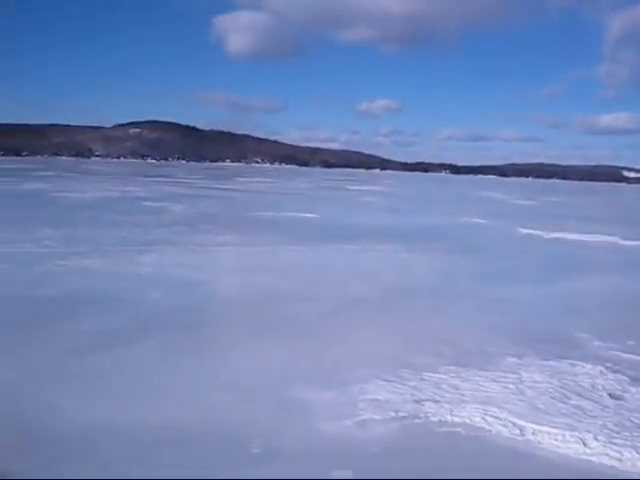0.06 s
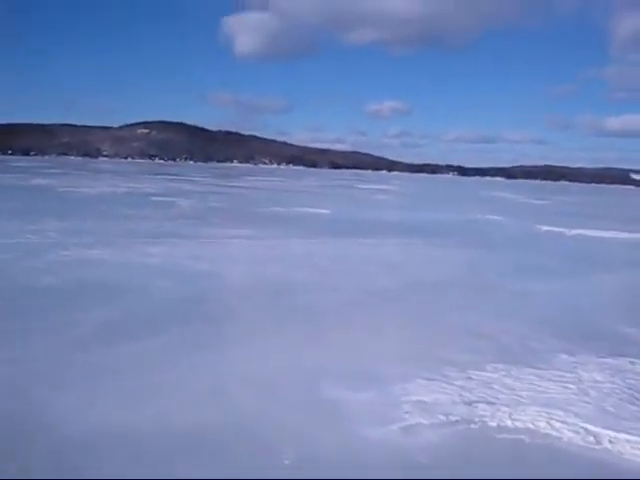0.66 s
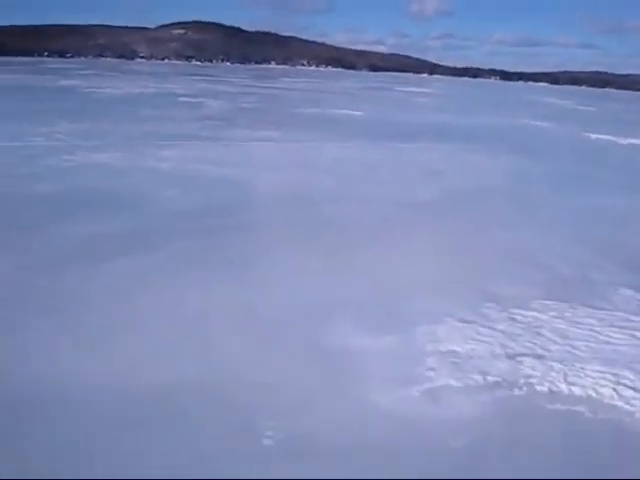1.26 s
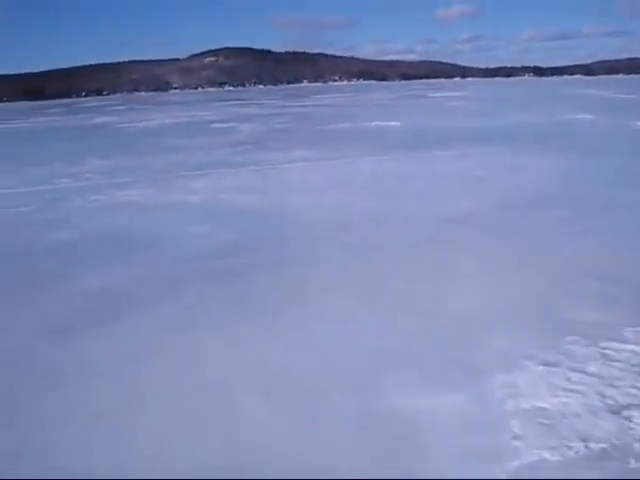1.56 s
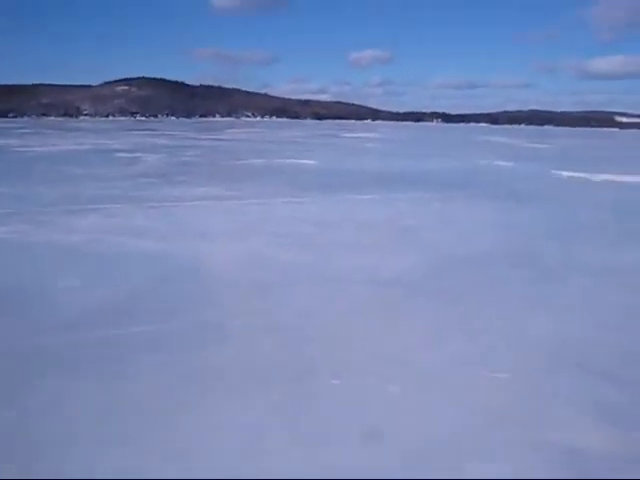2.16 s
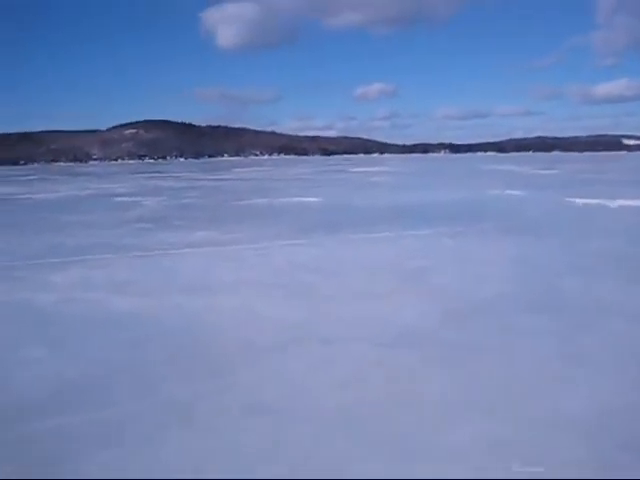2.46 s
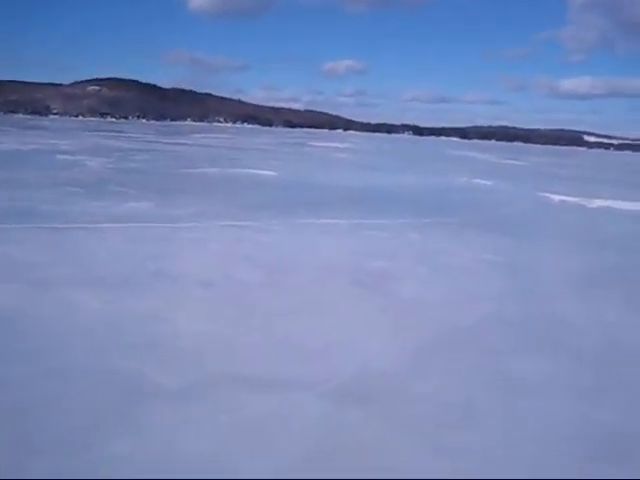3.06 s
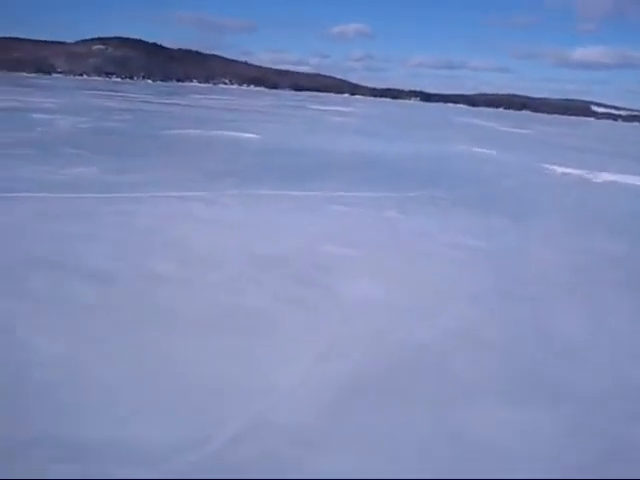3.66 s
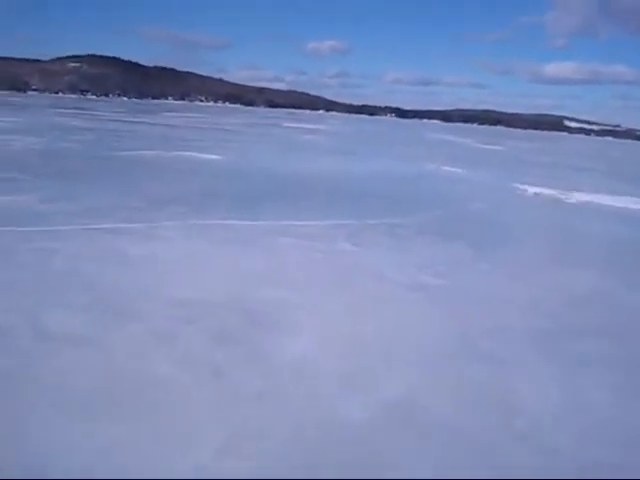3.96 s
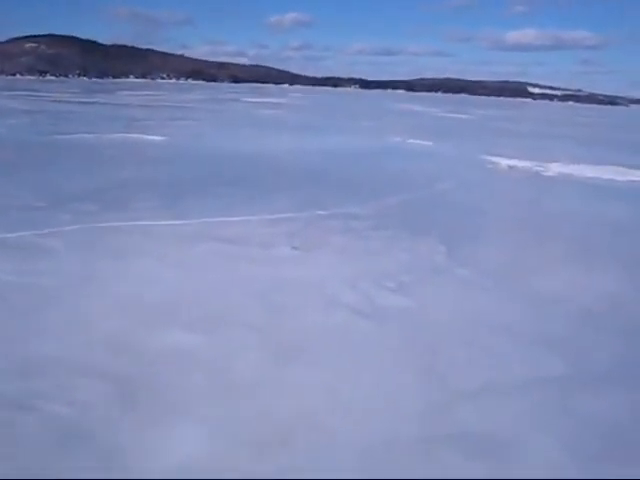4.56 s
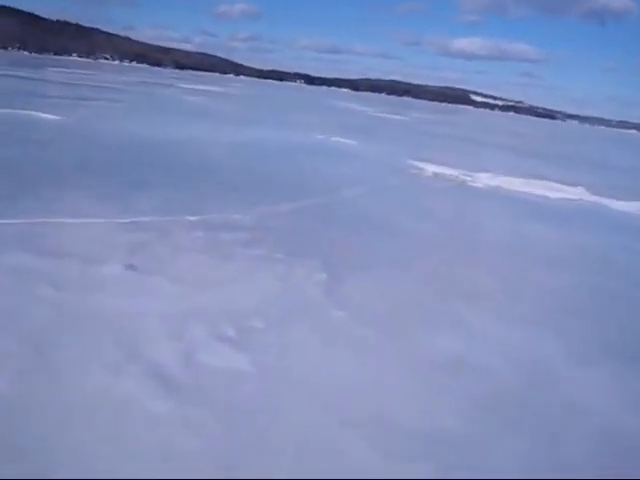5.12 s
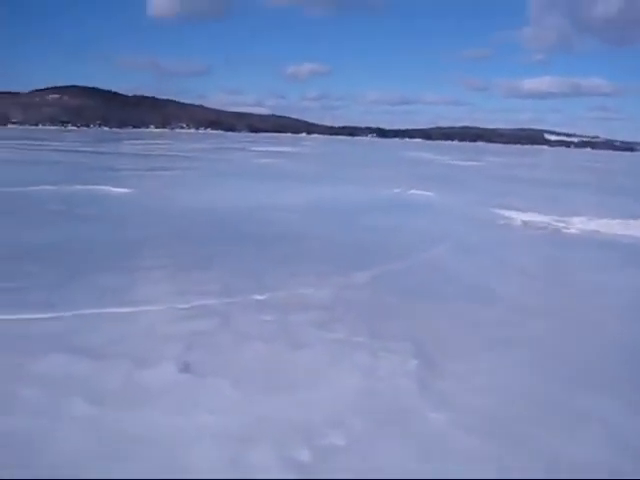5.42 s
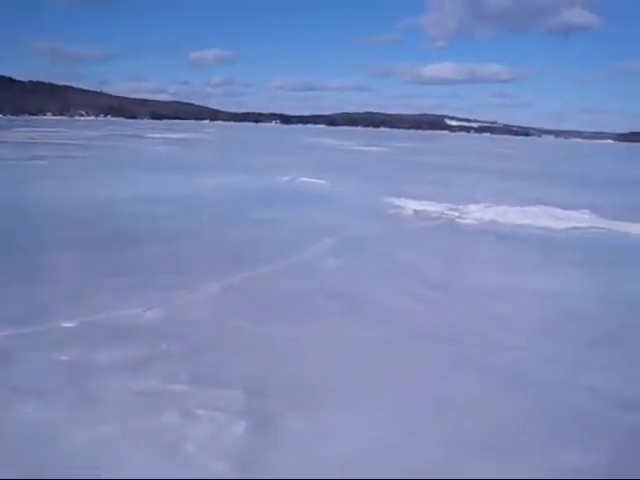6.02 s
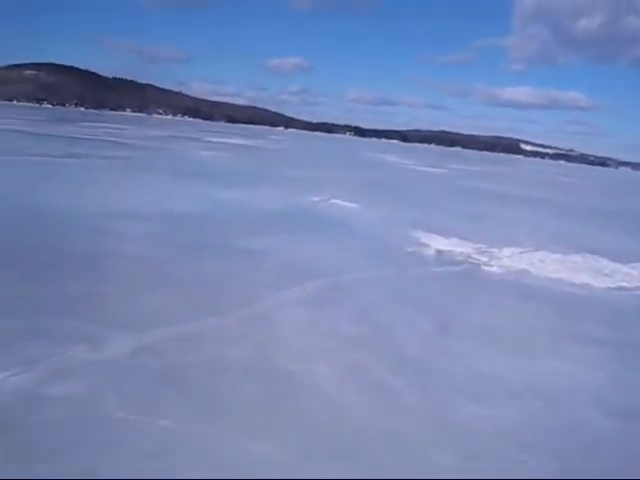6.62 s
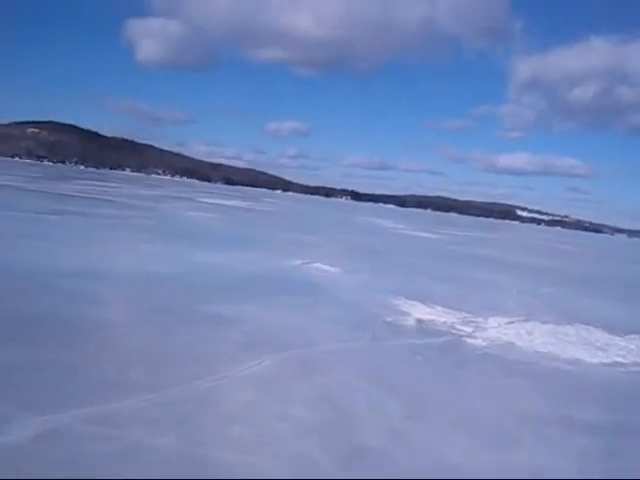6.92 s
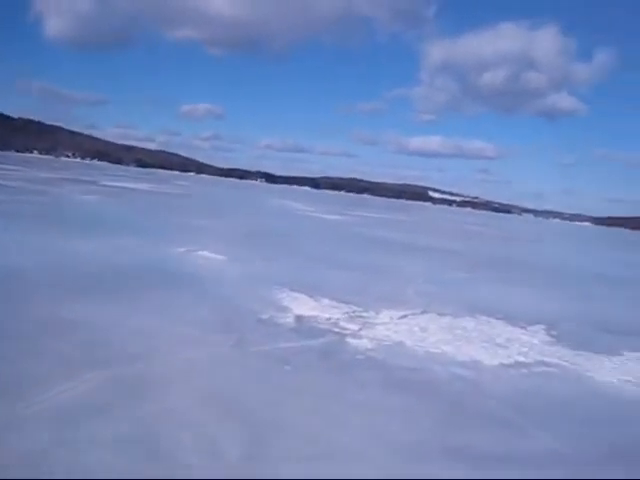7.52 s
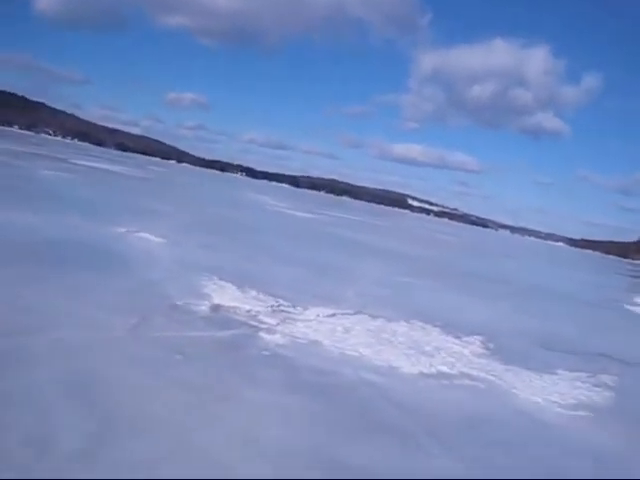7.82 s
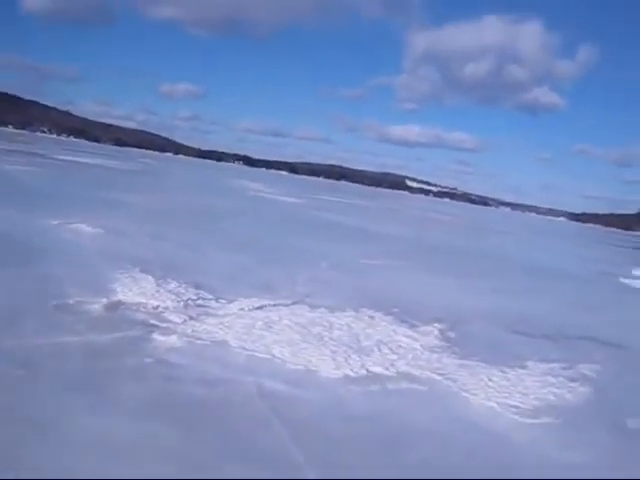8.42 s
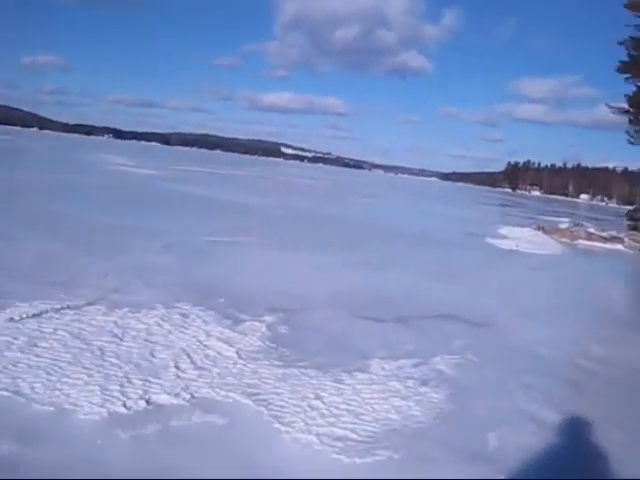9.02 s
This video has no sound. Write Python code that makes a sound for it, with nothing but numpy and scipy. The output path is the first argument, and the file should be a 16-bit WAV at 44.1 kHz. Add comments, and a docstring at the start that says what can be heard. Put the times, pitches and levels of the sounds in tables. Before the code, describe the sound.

A deep, uneven wind rumble buffets a microphone carried by a skater on an open frozen lake, with no echo. A few wind pops thump at about 0.5 to 1 second and recur now and then. From about 0.7 seconds the blades grind and hiss over the ice, swelling with each push, mixed with brief squeaks, quick scrapes, sharp clacks and small ticks of snapping ice. A stronger push comes near 2 seconds. From 3 to 5.5 seconds the skating is busiest, with clusters of knocks as the blades cross bumps. Several hard clacks and a bright squeak land just after 6 seconds. From about 7.3 seconds gusts strike the microphone in crackling, sputtering bursts, strongest around 7.7 seconds and again from 8.6 seconds. The blades fade beneath these pops, which continue to the end at about 9.3 seconds.

```python
"""Wind rumbles on the microphone and skate blades grind and hiss across a frozen lake.
A skater strides along with a small camera. The blades crush the ice, squeak and judder as an edge
sticks and slips, scrape where it bites, clack over bumps and tick as splinters snap off.
The wind breaks into sputtering pops when the skater turns into it. The open ice gives no echo."""
import sys
import numpy as np
from scipy import signal
from scipy.fft import rfft, irfft, next_fast_len
from scipy.io import wavfile
from scipy.ndimage import uniform_filter1d, map_coordinates

SR = 44100
rng = np.random.default_rng(int(sys.argv[2]) if len(sys.argv) > 2 else 0)


def output_pcm(signal):
    """Save a mono or channel-first signal as 16-bit PCM at the path in sys.argv[1].

    Samples are clipped to [-1, 1] before scaling.
    """
    pcm = np.clip(np.atleast_2d(signal).T, -1, 1) * 32767
    wavfile.write(sys.argv[1], SR, np.round(pcm).astype(np.int16))


N = 409248

# The blades coast, louder with speed. Each row: time in seconds, grind in dB, hiss in dB.
COASTING = [(0, -50, -59.5), (.7, -41, -52), (1.1, -47, -71), (1.37, -56, -55), (1.6, -45.5, -53.5),
            (1.8, -35, -48), (2.22, -50.5, -56), (2.5, -44.5, -48), (2.75, -42.5, -50), (3.25, -42, -51.5),
            (4.2, -36, -45), (4.62, -42, -51), (5.4, -39.5, -51), (6.2, -42, -52.5), (6.75, -45, -57),
            (7.3, -40, -49), (8.0, -52, -62), (8.58, -49, -60), (8.75, -62, -66.5), (9.28, -48.5, -64)]
# The skater leans on a blade. Each row: start and hold in seconds, grind in dB, hiss in dB.
BLADE_PUSHES = [(0.694, 0.04, -36, -43.5), (1.169, 0.022, -31, -48), (1.233, 0.06, -40.5, -44.5),
                (1.73, 0.14, -38, -48), (1.919, 0.074, -30, -40.5), (2.333, 0.062, -39.5, -65),
                (2.858, 0.21, -35.5, -47), (3.363, 0.19, -33, -48.5), (3.618, 0.11, -42, -43.5),
                (4.002, 0.077, -40, -43), (4.251, 0.1, -30.5, -47), (4.428, 0.038, -42, -46),
                (4.7, 0.044, -29, -43.5), (4.75, 0.17, -32.5, -41.5), (4.979, 0.018, -30.5, -42),
                (5.372, 0.032, -30.5, -44), (5.48, 0.0056, -31.5, -45), (6.205, 0.019, -29, -44),
                (6.477, 0.22, -53, -46), (6.827, 0.06, -37.5, -51), (7.017, 0.096, -39, -55),
                (7.492, 0.043, -40, -45), (7.898, 0.062, -65, -50.5), (8.222, 0.099, -38.5, -51),
                (8.342, 0.063, -45.5, -51), (8.533, 0.012, -42, -53), (8.602, 0.021, -35.5, -45.5)]
# The steel blade and its holder ring. Each row: pitch in Hz, width in Hz, level in dB.
BLADE_MODES = [(2710, 190, -1.5), (3310, 230, -5.5), (4520, 86, -5.5), (6500, 250, -15), (7800, 250, -7.5),
               (11530, 2600, 0.5)]
# An edge chatters and squeaks. Each row: start and length in seconds, level in dB,
# main, second and third pitch in Hz, base resonance width in Hz.
EDGE_SQUEAKS = [(0.29, 0.0046, -39, 4240, 1800, 4900, 250), (0.69, 0.046, -40, 2900, 2000, 3400, 220),
                (0.723, 0.024, -33.5, 1100, 1700, 3100, 220), (0.942, 0.016, -38, 1080, 1510, 3030, 200),
                (1.114, 0.0086, -35.5, 1450, 2480, 3200, 300),
                (1.527, 0.0074, -24.5, 1460, 2100, 6160, 250), (1.804, 0.062, -43, 1070, 1780, 2670, 170),
                (1.932, 0.0054, -27, 4500, 3460, 8950, 250), (1.953, 0.008, -27, 1810, 2580, 3300, 250),
                (2.829, 0.011, -36, 1250, 1930, 4460, 220), (2.986, 0.0082, -31.5, 1450, 1900, 950, 220),
                (3.11, 0.011, -23, 1330, 1860, 4250, 250), (3.551, 0.016, -35.5, 1270, 1640, 2480, 200),
                (3.583, 0.28, -43, 1170, 3440, 7650, 250), (3.705, 0.016, -33, 3760, 6200, 7900, 300),
                (3.964, 0.009, -30.5, 1910, 3120, 1100, 300), (4.031, 0.013, -33.5, 1870, 2680, 3920, 350),
                (4.318, 0.03, -28, 1060, 1640, 2520, 190), (4.498, 0.03, -33.5, 2620, 1700, 3170, 300),
                (4.684, 0.047, -35.5, 1200, 1880, 2900, 200), (4.864, 0.005, -31.5, 3280, 1900, 2600, 300),
                (6.026, 0.022, -31.5, 1290, 1170, 1880, 199), (6.148, 0.025, -31.5, 1360, 1630, 1110, 200),
                (6.219, 0.014, -36, 1150, 850, 1750, 250), (6.286, 0.0076, -33, 2600, 3100, 5800, 200),
                (6.3245, 0.005, -19, 2650, 1650, 3220, 550), (6.512, 0.076, -38, 1300, 6050, 3360, 220),
                (6.537, 0.014, -31, 1280, 4450, 6060, 220), (6.59, 0.021, -32.5, 1700, 3470, 5900, 220),
                (6.622, 0.027, -34.5, 1430, 3220, 2600, 220), (7.497, 0.03, -35, 1640, 2330, 3770, 220),
                (8.17, 0.0056, -44, 7100, 6400, 4300, 300), (8.194, 0.0062, -39, 3170, 4700, 6700, 500),
                (8.225, 0.025, -41, 1900, 2390, 4230, 280), (8.227, 0.033, -49, 4450, 6700, 8000, 400),
                (8.263, 0.052, -44, 1560, 2480, 3830, 250), (8.366, 0.023, -46, 1890, 2700, 5300, 250)]
# An edge catches with a hollow ring. Each row: start and length in seconds, level in dB, pitch in Hz.
EDGE_JUDDERS = [(0.691, 0.012, -19.5, 937), (1.028, 0.0086, -13.5, 950), (1.118, 0.01, -21, 990),
                (1.428, 0.0046, -21, 1710), (3.305, 0.0033, -20, 825), (6.3273, 0.0064, -9, 2550),
                (9.037, 0.0055, -18, 1090)]
# An edge bites. Each row: start and length in seconds, rasp before its trim in dB, spray in dB.
EDGE_BITES = [(0.689, 0.009, -22.5, -36), (0.944, 0.018, -30.5, -52), (1.028, 0.0075, -35, -33),
              (1.114, 0.012, -21, -47), (1.407, 0.028, -38, -41.5), (1.53, 0.0084, -26, -34),
              (1.934, 0.0055, -31, -24.5), (1.949, 0.01, -23.5, -29), (2.057, 0.0085, -30, -44),
              (2.306, 0.0058, -23, -38), (2.525, 0.009, -38, -39.5), (2.761, 0.0057, -31, -29.5),
              (3.111, 0.0073, -27, -25.5), (3.384, 0.0051, -20, -30.5), (3.968, 0.008, -27, -32),
              (4.001, 0.019, -53, -31.5), (4.066, 0.004, -27, -27), (4.379, 0.0068, -24.5, -38),
              (4.502, 0.022, -31, -36), (5.903, 0.013, -26, -41.5), (5.959, 0.0047, -28, -55),
              (5.98, 0.0075, -26.5, -56), (6.117, 0.013, -19, -43), (6.273, 0.014, -43, -43),
              (6.326, 0.0058, -34, -31.5), (6.444, 0.008, -38, -41.5), (6.491, 0.014, -32, -34),
              (6.929, 0.012, -28, -48), (8.493, 0.0092, -29, -54), (8.512, 0.0076, -28.5, -53)]
# A blade strikes the ice. Each row: start in seconds, knock in dB, pitch in Hz,
# time to fade by 60 dB in seconds, crack before its trim in dB.
BLADE_STRIKES = [(0.7218, -17.5, 990, 0.037, -48), (0.8624, -19, 910, 0.021, -42),
                 (0.8966, -23, 890, 0.053, -38.5), (1.1614, -21, 880, 0.03, -44),
                 (1.186, -9, 714, 0.0064, -36), (1.2557, -12.5, 1010, 0.011, -34),
                 (1.428, -3.5, 1190, 0.0079, -44), (2.0911, -5, 1130, 0.0051, -34),
                 (2.308, -15.5, 990, 0.015, -31.5), (2.9855, -11.5, 1040, 0.024, -38),
                 (3.0102, -17, 1000, 0.013, -52), (3.1616, -7.5, 1030, 0.021, -33),
                 (3.285, -11.5, 950, 0.016, -37), (3.3292, -8, 980, 0.011, -37),
                 (3.502, -4.5, 1590, 0.0038, -41), (3.5505, -19, 1235, 0.06, -41),
                 (3.705, -18, 1170, 0.025, -37), (3.79, -14, 1030, 0.012, -34),
                 (4.034, -13.5, 1120, 0.05, -39), (4.1056, -15.5, 1030, 0.02, -33),
                 (4.4317, -17, 810, 0.0086, -44), (4.5239, -0.5, 880, 0.0095, -55),
                 (4.5929, -18, 870, 0.015, -44), (4.691, -12, 1100, 0.025, -45),
                 (4.6981, -8.5, 1065, 0.014, -45), (4.831, -14, 860, 0.015, -31),
                 (4.8713, -3.5, 1190, 0.008, -39), (4.9028, -3.5, 920, 0.0095, -29.5),
                 (4.9301, -12.5, 850, 0.015, -34), (4.9521, -7, 1220, 0.0082, -37),
                 (4.9852, -16, 1180, 0.012, -38), (5.0278, -11.5, 1120, 0.012, -30.5),
                 (5.1779, -2, 1010, 0.012, -25.5), (5.3057, -8, 800, 0.018, -26.5),
                 (5.322, -10.5, 1000, 0.018, -31), (5.4605, -6, 750, 0.0099, -30.5),
                 (5.486, -14, 785, 0.013, -35), (5.5434, -14.5, 750, 0.017, -33),
                 (5.69, -14.5, 1080, 0.017, -36), (6.0918, 0, 1040, 0.0045, -33),
                 (6.1183, -0.5, 1280, 0.0076, -33), (6.2175, 4, 840, 0.0054, -33),
                 (6.3303, -15.5, 1830, 0.022, -37), (6.796, -15.5, 1340, 0.012, -36),
                 (6.823, -9, 765, 0.017, -31), (7.1122, -16.5, 1640, 0.014, -42)]
# A splinter of ice snaps off. Each row: start in seconds, level in dB.
SPLINTERS = [(1.737, -37), (1.846, -44), (2.002, -37), (2.022, -40), (2.122, -41), (3.7038, -35),
             (3.713, -38), (4.028, -19.5), (4.136, -33), (4.855, -34), (5.784, -43), (5.799, -37),
             (5.2648, -31), (5.889, -37), (5.908, -28), (6.311, -39), (6.68, -36), (7.252, -35),
             (7.325, -32.5)]

# Airflow on the microphone. Each row: time in seconds, rumble in dB, flutter before its trim in dB.
AIRFLOW = [(0, -22, -32), (.35, -27, -34), (.53, -18, -26.5), (1.3, -24, -31), (1.62, -15, -33),
           (1.9, -24.5, -33.5), (2.2, -19, -33.5), (2.6, -18, -32.5), (3.1, -23, -33), (3.4, -20, -28),
           (3.7, -22, -36), (4.3, -19, -31.5), (5.1, -20.5, -31.5), (6.35, -21.5, -36), (6.9, -23.5, -31),
           (7.35, -23, -31), (7.9, -30.5, -33.5), (8.55, -26, -31), (8.8, -36, -32.5), (9.28, -32.5, -44.5)]
# The rumble heaves as a large swirl rolls past. Each row: start and hold in seconds, level in dB.
SWIRLS = [(.135, 0.046, -30), (.46, 0.046, -19.5), (.69, 0.043, -30), (.89, 0.044, -16), (1.27, 0.014, -15),
          (1.52, 0.036, -23.5), (2.33, 0.067, -20), (3.24, 0.076, -24.5), (3.47, 0.045, -19.5),
          (4.04, 0.039, -23), (4.17, 0.049, -21), (4.82, 0.095, -18), (5.19, 0.029, -14.5),
          (5.47, 0.033, -19), (5.78, 0.041, -17), (6.0, 0.05, -20.5), (6.6, 0.048, -16.5),
          (6.82, 0.012, -15.5), (7.3, 0.028, -16.5), (7.43, 0.02, -14), (7.52, 0.02, -19),
          (8.4, 0.037, -21), (8.62, 0.056, -22)]
# The airflow drops away for a moment. Each row: start and hold in seconds, drop in dB.
WIND_LULLS = [(0.055, 0.061, 7), (0.187, 0.05, 3.5), (1.001, 0.016, 8), (1.592, 0.078, 5.5),
              (2.165, 0.051, 3.5), (2.26, .04, 7), (2.542, 0.033, 2.5), (3.514, 0.017, 10), (3.862, .03, 4),
              (4.026, 0.082, 2.5), (5.319, 0.028, 7), (5.546, 0.03, 4.5), (5.842, .045, 4.5),
              (5.934, 0.067, 6), (6.16, 0.032, 6), (6.252, 0.044, 4), (6.842, 0.022, 6), (7.481, .014, 11),
              (7.556, 0.018, 4), (7.854, 0.047, 6), (8.094, 0.05, 3), (8.328, 0.018, 5), (8.451, 0.04, 5),
              (8.722, 0.023, 8)]
# A gust hits the microphone port head on. Each row: start and hold in seconds, force in dB.
HEAD_GUSTS = [(.55, 0.014, -19.5), (1.045, 0.027, -25.5), (6.55, 0.1, -27.5), (7.35, 0.025, -22),
              (7.445, 0.012, -17), (7.61, 0.042, -22.5), (7.667, 0.083, -11), (7.75, 0.054, -15),
              (8.062, 0.011, -17), (8.38, 0.039, -20), (8.614, 0.073, -16.5), (8.69, 0.023, -18.5),
              (8.815, 0.037, -21), (8.926, 0.044, -16), (9.038, 0.0016, -19.5), (9.212, 0.029, -14.5),
              (9.27, 0.0097, -11.5)]
# A lone eddy pops or thumps on the port. Each row: time in seconds, peak before the port dulls it
# in dB, sharpness in Hz, back-swing in Hz.
LONE_EDDIES = [(0.138, -14.5, 90, 109), (0.506, -6, 980, 128), (0.598, -2, 180, 180),
               (0.627, -13, 500, 400), (0.667, -9, 500, 240), (0.726, -4.5, 600, 250),
               (0.8954, -6.5, 450, 240), (0.92, -4, 120, 75), (0.932, -7, 181, 550),
               (0.9923, -7.5, 250, 130), (1.0631, -1, 183, 183), (1.304, -13, 300, 350),
               (1.451, -12, 250, 550), (1.7904, -5, 250, 320), (1.8998, -10.5, 121, 131),
               (2.231, 2, 262, 450), (2.249, -12, 300, 398), (2.357, -9, 350, 420),
               (2.513, -11.5, 250, 350), (2.666, -10.5, 180, 150), (2.787, -9, 70, 80),
               (2.852, -4.5, 60, 74), (2.8738, -6.5, 700, 180), (3.42, -5, 180, 181), (3.826, -1, 89.5, 98),
               (5.2099, -9, 120, 170), (5.225, -3.5, 120, 75), (6.522, -7, 90, 75), (6.5597, -6, 496, 405),
               (6.705, -8, 1000, 418), (7.3156, -5, 120, 55), (7.369, -5.5, 180, 550),
               (7.4531, 0.5, 1190, 300), (7.4626, -3, 714, 240), (7.6331, -3, 494, 240),
               (7.6396, -9, 450, 260), (7.67, 1, 1330, 686), (7.708, -1.5, 1390, 298),
               (7.731, -0.5, 1200, 180), (7.7356, -1, 1200, 180), (7.7617, -7, 600, 350),
               (7.7888, -9, 1400, 240), (7.795, -4.5, 2420, 300), (7.811, -8.5, 1000, 550),
               (8.223, -9, 600, 400), (8.26, -10.5, 200, 550), (8.305, 1, 704, 450), (8.38, -9, 605, 300),
               (8.4033, -1.5, 780, 250), (8.619, 1.5, 1410, 158), (8.636, 0, 1390, 128),
               (8.668, -16, 1010, 400), (8.675, -5, 1480, 590), (8.6805, -3.5, 1190, 397),
               (8.73, -14, 500, 400), (8.8315, -15.5, 1380, 597), (8.865, -16, 600, 400),
               (8.9282, -4.5, 1180, 400), (8.935, -4, 1410, 322), (8.952, 1.5, 2700, 400),
               (8.976, -13, 1630, 400), (9.0411, -4.5, 2340, 293), (9.049, -17, 400, 300),
               (9.089, -20, 500, 400), (9.211, -6.5, 600, 400), (9.217, -6, 700, 400),
               (9.222, -4, 900, 300), (9.229, -5, 1700, 600)]
# Eddies crowd in a gust. Each row: pops per second, relative dB, sharpness in Hz, back-swing in Hz.
EDDY_CROWDS = [(189.6, -0.5, 590, 230), (130.5, -1.5, 900, 370), (73.4, -5, 2900, 1030)]
# Air rushes smoothly past the camera. Each row: time in seconds, level in dB.
AIR_RUSH = [(0, -59), (.17, -51), (.32, -50), (.46, -41.5), (.56, -47.5), (1.05, -48), (1.6, -55.5),
            (3.3, -47.5), (5.3, -50), (7.2, -55), (7.9, -55.5), (8.75, -67), (9.28, -61)]

# Tone curves for the ice, then for the wind. Each row: frequency in Hz, relative level in dB.
GRIND_EQ = [(150, -8), (400, -2.5), (700, -3), (1100, 0.5), (1600, -3.5), (2200, -14.5), (3200, -21.5),
            (5000, -33), (10000, -64)]
HISS_EQ = [(1000, 2), (2500, 5), (3600, 2.5), (5200, -1), (8200, -5), (9300, -14), (11500, -14),
           (13500, -16), (15500, -25)]
POWDER_EQ = [(5000, -11), (7900, -0.5), (9500, -4), (11300, -2), (13500, -3), (15500, -6)]
RASP_EQ = [(300, -21), (700, 11), (1200, 13.5), (1800, 6), (2600, -7), (4000, -19), (9000, -50)]
RUMBLE_EQ = [(10, -16), (25, -1), (45, -1.5), (80, -2.5), (120, -8.5), (200, -19.5), (400, -51),
             (900, -104)]
FLUTTER_EQ = [(50, -21), (100, 0.5), (150, 1.5), (230, -3), (350, -9), (600, -18.5), (1200, -30),
              (4000, -61.5)]
CHURN_EQ = [(60, 15), (200, 11), (500, 5), (1300, -8), (2200, -22), (4000, -60)]
SOFT_AIR_EQ = [(500, 1.5), (1400, 1.5), (3500, -3), (6000, -12), (10000, -43)]
BRIGHT_AIR_EQ = [(1000, -1), (3000, 0), (6000, -6.5), (9000, -13), (13000, -29)]

GUST_ATTACK_S, GUST_RELEASE_S = 0.009, 0.0074


def glide(uneven_db=2.04, chatter_db=1.77, powder_db=-8, smear_db=-2):
    """The running blade crushes ice: the grind flickers over the uneven surface, the hiss less so."""
    grind_db, hiss_db = blade_levels()
    load_db = uneven_db * wobble(50) + chatter_db * wobble(200)
    smear = coloured(chips(rate=110, spread_db=2.5, smooth=0.63), GRIND_EQ)
    crush = amp(smear_db) * smear + crunch() / np.sqrt(2)
    spray = steel(chips(rate=130, spread_db=19.5, smooth=0.77), ring=0.63)
    # the finest powder fizzes off the edge, the more so the harder it cuts
    powder = coloured(chips(rate=190, spread_db=27, smooth=0.92, crumble_s=0.0011), POWDER_EQ)
    cutting = np.clip(hiss_db + 54, -12, 8)
    sizzle = spray + amp(powder_db + 0.17 * cutting) * powder
    grind = amp(grind_db + load_db + 1.3 * wobble(70)) * crush
    hiss = amp(hiss_db + 0.58 * load_db + 2 * wobble(18)) * sizzle
    return grind + hiss


def blade_levels(attack_s=0.038, release_s=0.024):
    """Grind and hiss in dB: the coasting level, raised by each push."""
    grind_db, hiss_db = curves(COASTING)
    digs = swells([(s, hold, db) for s, hold, db, _ in BLADE_PUSHES], attack_s, release_s)
    sprays = swells([(s, hold, db) for s, hold, _, db in BLADE_PUSHES], attack_s, release_s)
    return 20 * np.log10(np.hypot(amp(grind_db), digs)), 20 * np.log10(np.hypot(amp(hiss_db), sprays))


def chips(rate, spread_db, smooth, crumble_s=0.0026):
    """Ice fractures: snaps of uneven size, each crumbling away, over smooth friction noise."""
    snaps = (rng.random(N) < rate / SR) * amp(spread_db * (2 * rng.random(N) - 1))
    energy = signal.lfilter([1], [1, -np.exp(-1 / (crumble_s * SR))], snaps ** 2)
    return np.sqrt(energy / np.mean(energy) + smooth ** 2) * contact_noise(depth_db=2)


def crunch(rate=380, centre_hz=1550, pitch_spread=0.72, decay_cycles=0.79, spread_db=8, tilt_db=-5):
    """Crumbs crack under the edge; each rings for a few cycles, the small high ones more softly."""
    when, size, pitch = rng.uniform(-1, 1, (int(rate * N / SR), 3)).T[:, :, None]
    t = np.arange(SR // 60) / SR
    cycles = centre_hz * np.exp(pitch_spread * pitch) * t
    ring = cycles * np.exp(-cycles / decay_cycles) * np.sin(2 * np.pi * cycles)
    grains = amp(spread_db * size + tilt_db * pitch) * ring
    positions = (np.abs(when) * N).astype(int) + np.arange(len(t))
    return unit(np.bincount(positions.ravel(), grains.ravel(), N)[:N])


def contact_noise(depth_db):
    """Friction wanders along the blade: pitches swell and fade in small patches."""
    spectrum = signal.stft(rng.standard_normal(N), nperseg=256)[2]
    patches = uniform_filter1d(rng.standard_normal(spectrum.shape), size=3, axis=0)
    patches = uniform_filter1d(patches, size=7, axis=1)
    return signal.istft(spectrum * amp(depth_db * unit(patches)), nperseg=256)[1][:N]


def steel(friction, ring):
    """The bright side of the friction rings in the blade."""
    def response(hz):
        return 1 + ring * sum(amp(db) * resonance(hz, pitch, width) for pitch, width, db in BLADE_MODES)
    return coloured(filtered(friction, response), HISS_EQ)


def squeaks(mode_db=(0, -7.5, -9), slip_hz=110, slip_db=20, soften_hz=8500, drift=0.055, fade_s=0.0048):
    """A leaning edge sticks and slips through the ice and sounds three resonances of the skate."""
    out, t = np.zeros(N), np.arange(SR // 3) / SR
    for s, length, db, *pitches, width_hz in EDGE_SQUEAKS:
        def body(hz):
            modes = sum(amp(level) * resonance(hz, pitch, width_hz + 0.0011 * pitch)
                        for pitch, level in zip(pitches, mode_db))
            return modes / np.hypot(1, (hz / soften_hz) ** 2)
        slips = np.cumsum(slip_hz * np.exp(0.31 * wobble(60, size=len(t)))) / SR
        friction = amp(-slip_db * (slips % 1)) * rng.standard_normal(len(t))
        # the pitches waver as the contact travels along the blade
        waver = drift * wobble(55, size=len(t)) * np.clip(t / 0.0217, 0, 1)
        squeak = np.interp(np.cumsum(1 + waver) / SR, t, unit(filtered(friction, body)))
        pressure = np.clip(t / fade_s, 0, 1) * np.clip((length - t) / fade_s + 1, 0, 1)
        add(out, s, amp(db) * pressure * squeak)
    return out


def judders(upper_ratio=2.07, upper_db=-18, waver=0.047):
    """The caught skate swings up in its two lowest modes and settles again."""
    out, t = np.zeros(N), np.arange(SR // 20) / SR
    for s, length, db, hz in EDGE_JUDDERS:
        swing = np.sin(np.pi * np.clip(t / length, 0, 1) ** 0.49) ** 2
        phase = 2 * np.pi * hz * np.cumsum(1 + waver * wobble(660, size=len(t))) / SR
        ring = np.sin(phase) + amp(upper_db) * np.sin(upper_ratio * phase)
        add(out, s, amp(db) * swing * ring)
    return out


def scrapes(rasp_trim_db=-1, rise_s=0.00066, fall_s=0.0024):
    """An edge shaves the ice for an instant and lets go: a low rasp and a bright spray."""
    t = np.arange(SR // 8) / SR
    rasp, spray = np.zeros(N), np.zeros(N)
    for s, length, rasp_db, spray_db in EDGE_BITES:
        bite = (1 - np.exp(-t / rise_s)) * np.exp(-np.maximum(t - length + fall_s, 0) / fall_s)
        add(rasp, s, amp(rasp_db + rasp_trim_db) * bite)
        add(spray, s, amp(spray_db) * bite)
    shaving = chips(rate=720, spread_db=23, smooth=2.4)
    flying_chips = shaving + 2 * np.gradient(shaving)  # brighter than the glide
    return rasp * coloured(shaving, RASP_EQ) + spray * steel(flying_chips, ring=2.4)


def clacks(crack_trim_db=5, crack_t60=0.017, attack_s=0.00027, upper_db=-8, thud_db=-12):
    """Each blow rings the skate briefly, with a thud of the boot and a crack of ice."""
    t = np.arange(SR // 12) / SR
    knocks, cracks = np.zeros(N), np.zeros(N)
    onset = 1 - np.exp(-t / attack_s)
    blows = BLADE_STRIKES + bumps()
    detunes = 2 * rng.random((len(blows), 2)) - 1
    for (s, knock_db, hz, t60, crack_db), detune in zip(blows, detunes):
        upper_hz, thud_hz = hz + 600 + 220 * detune[0], 520 + 100 * detune[1]
        modes = [(hz, 0, t60), (upper_hz, upper_db, 0.57 * t60), (thud_hz, thud_db, 0.012)]
        ring = sum(amp(db - 60 * t / life) * np.sin(2 * np.pi * pitch * t) for pitch, db, life in modes)
        add(knocks, s, -amp(knock_db) * onset * ring)
        add(cracks, s, amp(crack_db + crack_trim_db - 60 * t / crack_t60) * onset)
    rattle = 1 + 0.22 * wobble(2500)  # crumbling ice roughens the ring
    return knocks * rattle + cracks * steel(contact_noise(depth_db=3.5), ring=2.4)


def bumps(rate=3.2, over_grind_db=18, spread_db=8, centre_hz=1180, pitch_spread=0.083, t60=0.014):
    """Small bumps pass under the blades at random, louder with speed; rows as in BLADE_STRIKES."""
    count = int(rate * N / SR)
    when, size, pitch = rng.random((count, 3)).T
    times, grind_db, _ = np.transpose(COASTING)
    starts = when * N / SR
    knock_db = np.interp(starts, times, grind_db) + over_grind_db + spread_db * (2 * size - 1)
    hz = centre_hz * np.exp(pitch_spread * (2 * pitch - 1))
    crack_db = knock_db - 22
    return list(zip(starts, knock_db, hz, np.full(count, t60), crack_db))


def ticks(t60=0.012):
    """Each snapping splinter gives the steel one short, bright tick."""
    snaps, t = np.zeros(N), np.arange(SR // 25) / SR
    for s, db in SPLINTERS:
        add(snaps, s, amp(db - 60 * t / t60))
    return snaps * steel(np.diff(rng.standard_normal(N + 1)), ring=1.9)


def wind(flutter_trim_db=2, lump_db=5, lull_fade_s=0.009):
    """Turbulence on the microphone: a deep rumble heaves with each swirl, gusts stir a lumpy flutter."""
    rumble_db, flutter_db = curves(AIRFLOW)
    lull_db = sum(db * envelope(s, hold, lull_fade_s, lull_fade_s) for s, hold, db in WIND_LULLS)
    flow_db = 0.65 * surge(18) - lull_db
    heave = swells(SWIRLS, attack_s=0.0095, release_s=0.011)
    stir = amp(-11) * heave + amp(-7) * swells(HEAD_GUSTS, GUST_ATTACK_S, GUST_RELEASE_S)
    deep = coloured(rng.standard_normal(N), RUMBLE_EQ)
    # level the noise, so that slow swells come from the airflow alone
    deep /= np.sqrt(uniform_filter1d(uniform_filter1d(deep ** 2, size=3000), size=3000))
    lumpy = unit(amp(lump_db * surge(60)) * coloured(rng.standard_normal(N), FLUTTER_EQ))
    rumble = np.hypot(amp(rumble_db + flow_db + 2.5 * surge(22)), heave) * deep
    flutter = np.hypot(amp(flutter_db + flutter_trim_db + flow_db), stir) * lumpy
    return rumble + flutter


def eddy(sharp_hz, swing_hz, blunt=0.071):
    """One pop: a sudden suction peak in mid-window, after which the pressure swings back."""
    t = (np.arange(4096) - 2048) / SR
    suction = np.exp(-np.hypot(2 * np.pi * sharp_hz * t, blunt))
    pop = filtered(suction, lambda hz: resonance(hz, swing_hz, 1.57 * swing_hz))
    return -pop / np.max(np.abs(pop))


def wind_pops(port_hz=6000):
    """Lone eddies pop on the microphone; its narrow port blunts each one."""
    pops = np.zeros(N)
    for s, db, sharp_hz, swing_hz in LONE_EDDIES:
        pop = eddy(sharp_hz, swing_hz)
        add(pops, s - len(pop) / 2 / SR, amp(db) * pop)
    return filtered(pops, lambda hz: 1 / np.hypot(1, (hz / port_hz) ** 2))


def gust_sputter(trim_db=-3, spread_db=5, churn_gain=0.34, top_hz=2150, dull_hz=900, crisp_at_db=-15):
    """Eddies crowd into a crackling flap: dull in a weak gust, crisp in a strong one."""
    pops = np.zeros(N)
    for rate, db, sharp_hz, swing_hz in EDDY_CROWDS:
        count = int(rate * N / SR)
        jitter, size = rng.random((count, 2)).T
        arrivals = ((np.arange(count) + jitter) * SR / rate).astype(int)
        crowd = np.bincount(arrivals, amp(db + spread_db * (2 * size - 1)), N)[:N]
        pops += signal.fftconvolve(crowd, eddy(sharp_hz, swing_hz), "same")
    pops = unit(filtered(pops, lambda hz: 1 / np.hypot(1, (hz / top_hz) ** 4)))
    crisp = unit(pops + churn_gain * coloured(rng.standard_normal(N), CHURN_EQ))
    dull = unit(filtered(crisp, lambda hz: 1 / (1 + (hz / dull_hz) ** 2)))
    force = swells(HEAD_GUSTS, GUST_ATTACK_S, GUST_RELEASE_S)
    crispness = np.clip(force / amp(crisp_at_db), 0, 1)
    return amp(trim_db) * force * (crispness * crisp + (1 - crispness) * dull)


def air():
    """Passing air lays a soft bed of hiss, brighter when it is stronger."""
    level_db, = curves(AIR_RUSH)
    soft = coloured(rng.standard_normal(N), SOFT_AIR_EQ)
    bright = coloured(rng.standard_normal(N), BRIGHT_AIR_EQ)
    brightness = np.clip((level_db + 50.5) / 16, 0, 1)
    return amp(level_db) * (np.sqrt(1 - brightness) * soft + np.sqrt(brightness) * bright)


def amp(db):
    """Decibels to gain."""
    return 10 ** (np.asarray(db) / 20)


def unit(x):
    """Scale to rms 1."""
    return x / np.sqrt(np.mean(x ** 2) + 1e-20)


def curves(rows):
    """Fader rides: one value per sample for each column after the time."""
    times, *columns = np.transpose(rows)
    return [np.interp(np.arange(N) / SR, times, column) for column in columns]


def wobble(rate, size=N):
    """A smooth random curve, rate knots a second."""
    knots = rng.standard_normal(int(size * rate / SR) + 4)
    return map_coordinates(knots, [np.arange(size) * rate / SR])


def surge(rate):
    """A wobble whose peaks are rounded off while its dips stay deep."""
    curve = wobble(rate)
    return np.minimum(curve, np.tanh(curve))


def envelope(s, hold, attack_s, release_s):
    """Rise up to time s, hold, then die away over twice the release."""
    t = np.arange(N) / SR - s
    return np.clip(1 + t / attack_s, 0, 1) * np.clip(1 - (t - hold) / (2 * release_s), 0, 1) ** 2


def swells(events, attack_s, release_s):
    """Joint gain of events that share one attack and release, summed by power."""
    return np.sqrt(sum((amp(db) * envelope(s, hold, attack_s, release_s)) ** 2 for s, hold, db in events))


def filtered(x, response):
    """x through a complex frequency response."""
    size = next_fast_len(len(x) + SR // 4)
    return irfft(rfft(x, size) * response(np.fft.rfftfreq(size, 1 / SR)), size)[:len(x)]


def coloured(x, eq):
    """x through a tone curve, at rms 1."""
    points_hz, db = np.transpose(eq)
    return unit(filtered(x, lambda hz: amp(np.interp(np.log(hz + 1), np.log(points_hz), db))))


def resonance(hz, centre, width):
    """Response of one damped mode."""
    return 1j * hz * width / (centre ** 2 - hz ** 2 + 1j * hz * width)


def add(track, s, sound):
    """Mix a sound into the track from time s on."""
    start = max(0, round(s * SR))
    part = track[start:start + len(sound)]
    part += sound[:len(part)]


def scene():
    """Skates below, wind at the microphone, in mono."""
    skates = glide() + squeaks() + judders() + scrapes() + clacks() + ticks()
    return (skates + wind() + air() + wind_pops() + gust_sputter())[None]


def record(dry, hardness=6, top_hz=15600):
    """The camera rounds off the largest pops and keeps nothing above its band limit."""
    rounded = dry[0] / (1 + np.abs(dry[0]) ** hardness) ** (1 / hardness)
    return filtered(rounded, lambda hz: hz < top_hz)[None]


dry = scene()
out = record(dry)
output_pcm(out)
```